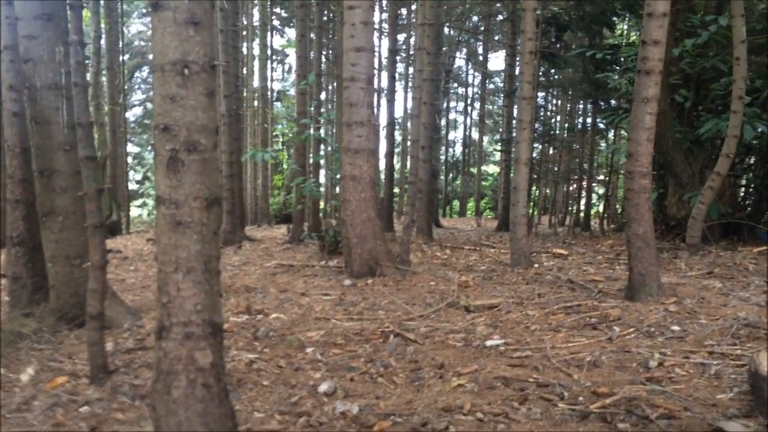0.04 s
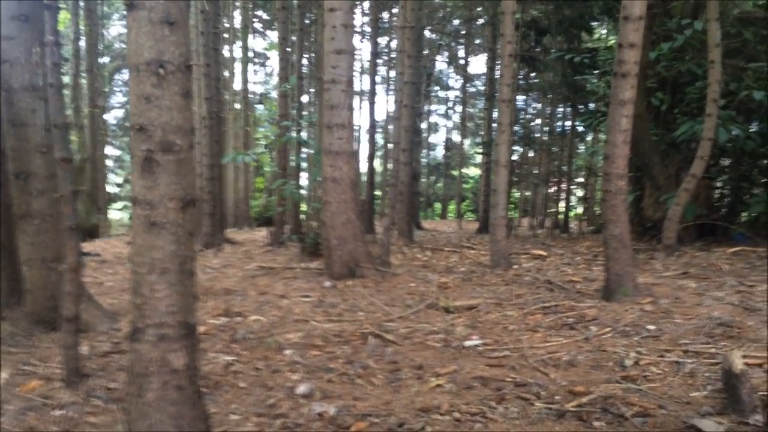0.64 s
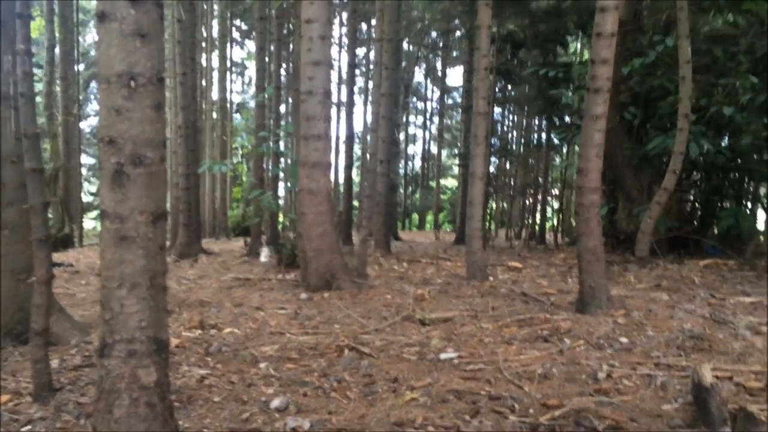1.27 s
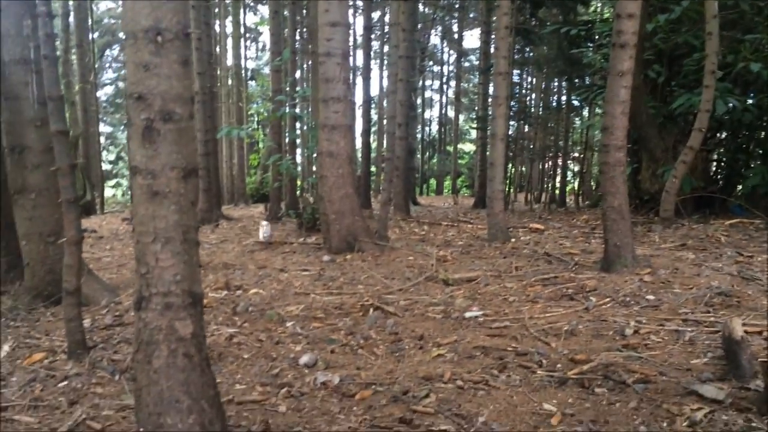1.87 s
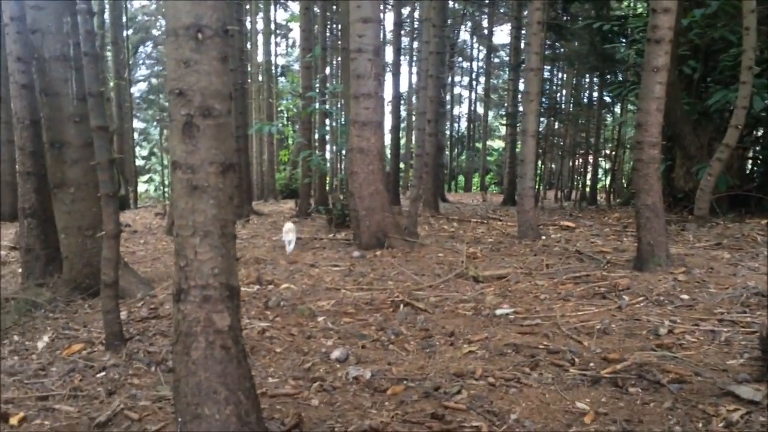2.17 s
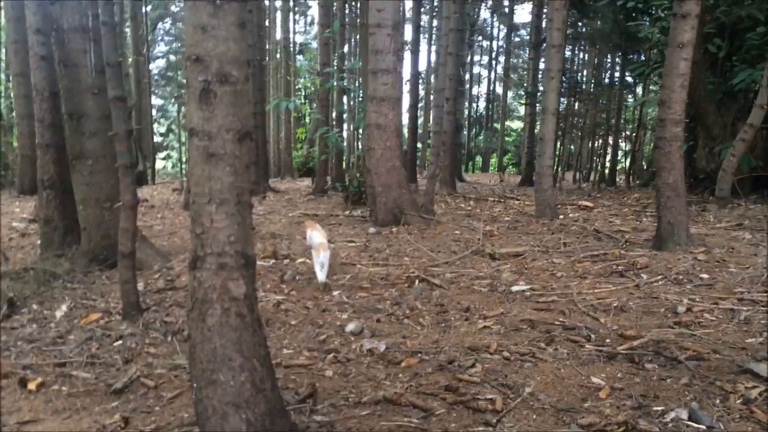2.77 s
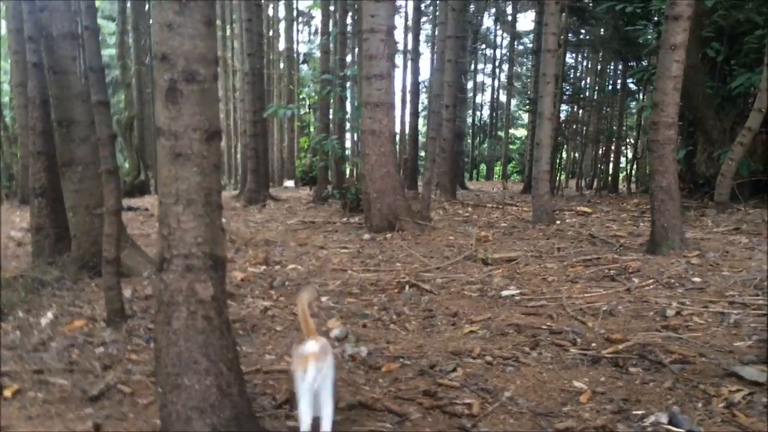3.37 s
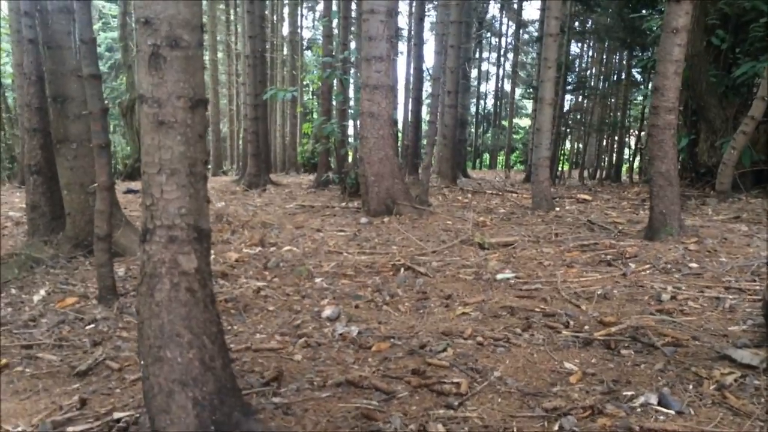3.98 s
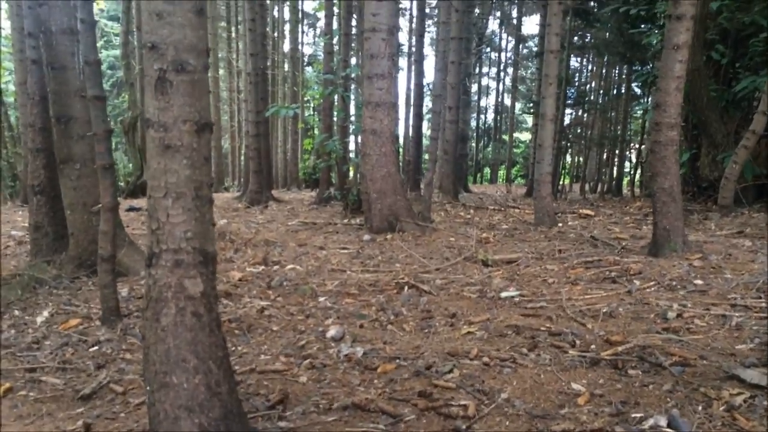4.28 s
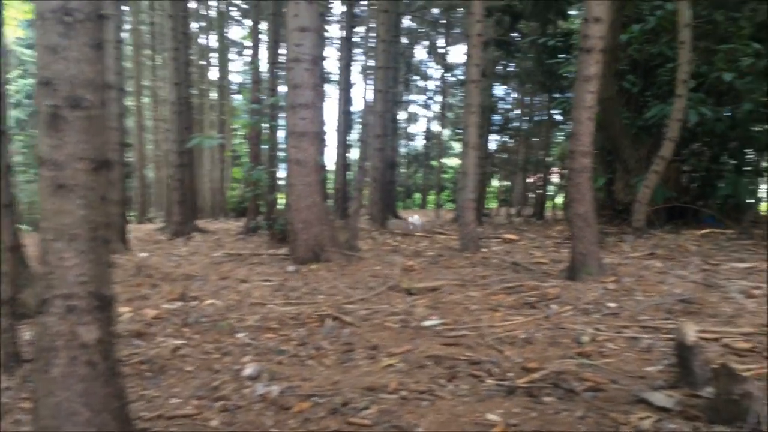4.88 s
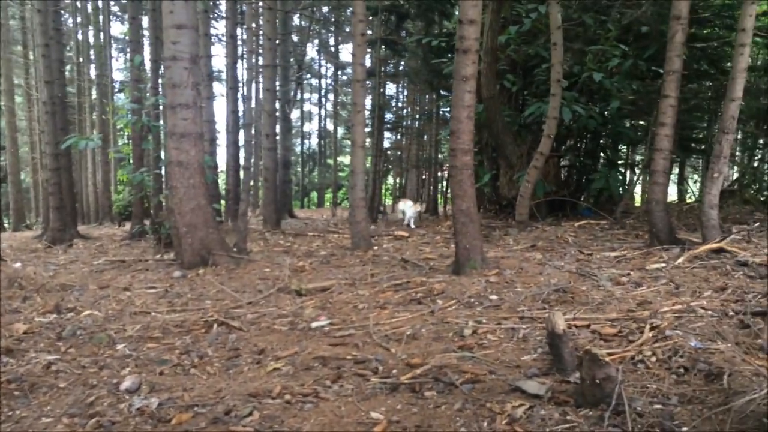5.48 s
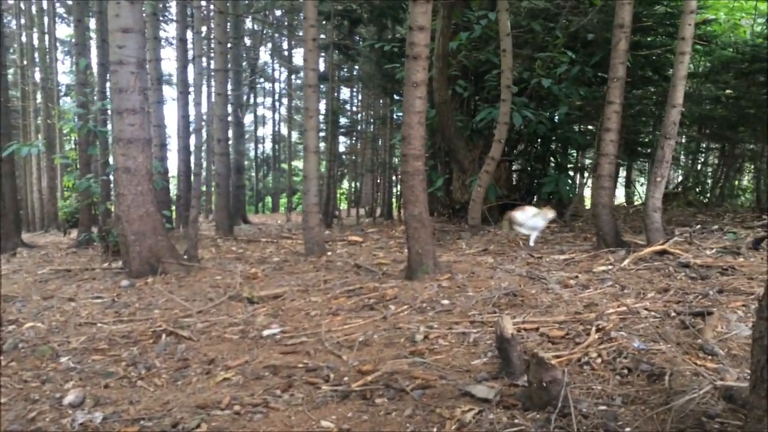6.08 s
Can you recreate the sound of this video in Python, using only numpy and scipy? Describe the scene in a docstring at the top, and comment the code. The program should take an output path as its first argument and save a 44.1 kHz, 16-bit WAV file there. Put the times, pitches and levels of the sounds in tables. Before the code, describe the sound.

In a quiet wood, someone shakes a plastic tub of dry pet food right by the microphone. Quick, regular strokes alternate a hard, bright crash of pellets with a softer slide back, over hollow plastic knocks and with barely any echo. Near the end the rattle dies away with a few last ticks, leaving a brief, soft crackle of a cat's paws on dry needles and a barely audible low hum.

```python
"""Cat food shaken in a conifer wood.

Dry pellets are shaken to and fro in a plastic tub, about three times a second, then left to settle.
They fly into the far end with a hard crash, then slide home into a softer one; the wall flexes with
a dull pop between crashes. Trunks scatter the rattle, a far engine hums, and the leaf litter
crackles faintly under a running cat."""
import sys
import numpy as np
from scipy import signal
from scipy.fft import rfft, irfft, next_fast_len
from scipy.io import wavfile
from scipy.ndimage import map_coordinates

SR = 44100
rng = np.random.default_rng(int(sys.argv[2]) if len(sys.argv) > 2 else 0)


def int16_out(signal):
    """Quantize to a 16-bit WAV file."""
    q = np.round(np.clip(np.atleast_2d(signal).T, -1, 1) * 32767)
    wavfile.write(sys.argv[1], SR, q.astype(np.int16))


N = 270639

# forward strokes into the far end: first_pellet_s, first_pellet_db, piling_s, crash_db, treble_db
THROWS = [(0.179, -18, .028, -27.5, 1), (0.530, -25.5, 0.029, -25.5, -1.5), (0.847, -15, 0.016, -24.5, 0),
          (1.160, -21.5, 0.03, -28, 1), (1.477, -26, .036, -23.5, 1), (1.767, -23.5, 0.033, -25, 3.5),
          (2.075, -17.5, 0.017, -24, 0), (2.400, -13.5, .02, -25, -0.5), (2.692, -18, 0.013, -25.5, 0.5),
          (2.9869, -25, 0.048, -27.5, 3), (3.312, -20.5, 0.03, -26, 0), (3.599, -29.5, 0.051, -27, 0.5),
          (3.912, -23, .042, -29, -4.5), (4.2345, -17, 0.04, -27.5, -0.5), (4.55, -15, 0.021, -26.5, 3.5),
          (4.8277, -14.5, 0.022, -25.5, 2.5), (5.118, -9.5, .017, -26, 1)]
# back strokes into the near end: first_pellet_s, piling_s, crash_db, slide_db
RETURNS = [(0.008, 0.042, -30, -38), (0.382, .024, -30.5, -41), (0.712, 0.025, -27, -40.5),
           (1.014, 0.033, -29, -41.5), (1.3546, 0.03, -27.5, -40.5), (1.6557, 0.018, -26.5, -38),
           (1.951, .02, -25, -35), (2.268, 0.029, -27.5, -41.5), (2.577, 0.024, -26.5, -40.5),
           (2.878, 0.023, -28, -40.5), (3.197, 0.018, -27.5, -41.5), (3.475, .032, -32, -36.5),
           (3.81, 0.035, -32, -47.5), (4.133, 0.0079, -32, -41), (4.434, 0.018, -29, -38.5),
           (4.723, 0.025, -29.5, -36), (5.0015, 0.026, -29, -37.5), (5.2878, 0.047, -39, -42)]
# spectrum of one pellet on plastic: freq_hz, gain_db
TICK_COLOUR = [(100, -17.5), (1000, 3.5), (3000, 2.5), (7000, 4), (11000, -4), (15000, -16)]


def amp(db):
    return 10 ** (np.asarray(db) / 20)


def unit(x):
    return x / np.sqrt(np.mean(x ** 2) + 1e-20)


def along(points, hz):
    """Interpolate (freq_hz, value) points on a log axis."""
    freqs_hz, values = np.transpose(points)
    return np.interp(np.log(hz + 1), np.log(freqs_hz + 1), values)


def wobble(rate_hz):
    """Smooth random curve with knots at rate_hz."""
    knots = rng.standard_normal(int(N * rate_hz / SR) + 4)
    return map_coordinates(knots, [np.arange(N) * rate_hz / SR])


def filtered(x, response):
    """Apply response(hz) to the spectrum of x."""
    size = 2 * next_fast_len(N)
    return irfft(rfft(x, size) * response(np.fft.rfftfreq(size, 1 / SR)), size)[..., :N]


def low_cut(x, corner_hz):
    return filtered(x, lambda hz: 1 - 1 / (1 + (hz / corner_hz) ** 4))


def causal(gain):
    """Minimum-phase response: rings only after the blow."""
    cepstrum = irfft(np.log(np.maximum(gain, 1e-6)))
    half = len(cepstrum) // 2
    cepstrum[1:half] *= 2
    cepstrum[half + 1:] = 0
    return np.exp(rfft(cepstrum))


def add(track, start_s, sound):
    part = track[max(round(start_s * SR), 0):][:len(sound)]
    part += sound[:len(part)]


def contacts(rate_hz, spread_db, click_s, ring_s, ring_db, spots):
    """Hail of pellet contacts, whitened, rms 1; each wall spot has its own click and short ring."""
    t = np.arange(SR // 40) / SR
    hail, power = np.zeros(N), 0
    for _ in range(spots):
        hits = rng.random(N) < rate_hz / SR / spots
        size_db = spread_db * np.minimum(rng.standard_normal(N), 1.5)
        wander_db = 3 * np.tanh(wobble(14))  # the load wanders between spots
        click = unit(rng.standard_normal(len(t)) * np.exp(-t / click_s))
        modes_hz = np.exp(rng.uniform(np.log(650), np.log(6000), size=3))
        ring = sum(np.sin(2 * np.pi * hz * t) for hz in modes_hz)
        contact = click + amp(ring_db) * unit(ring * np.exp(-t / ring_s))
        hail += signal.oaconvolve(hits * amp(size_db + wander_db), contact)[:N]
        power = power + np.abs(rfft(contact)) ** 2
    bins_hz = np.fft.rfftfreq(len(t), 1 / SR)
    return unit(filtered(hail, lambda hz: 1 / np.sqrt(np.interp(hz, bins_hz, power))))


def ticks(rows, click_s, patter_s):
    """Sharp ticks, each with a brief patter; rows: start_s, level_db, relative_patter_db."""
    track, t = np.zeros(N), np.arange(SR // 10) / SR
    for start_s, level_db, patter_db in rows:
        click = np.tanh(rng.standard_normal(len(t))) * np.exp(-t / click_s)
        grit = rng.standard_normal(len(t))
        patter = unit(grit * np.sqrt(np.abs(grit))) * np.exp(-t / patter_s)
        add(track, start_s, amp(level_db) * (click + amp(patter_db) * patter))
    return track


def impacts():
    """Crashes of both strokes: peak_s, level_db, rise_s, fall_s, hollow_db, bright_db."""
    rows = []
    for start_s, _, piling_s, level_db, treble_db in THROWS:
        length_s = 0.046 * amp(-0.3 * (level_db + 24.5))  # harder is shorter
        rise_s = 0.78 * piling_s
        fall_s = max(length_s - rise_s, 0.01)
        rows.append((start_s + piling_s, level_db, rise_s, fall_s, 0.5, treble_db + 1.06))
    for start_s, piling_s, level_db, _ in RETURNS:
        rows.append((start_s + piling_s, level_db, piling_s, 0.026, -1.3, -0.24))  # thinner, duller
    rows = np.array(rows)
    rows[:, 5] += 0.23 * (rows[:, 1] - rows[:, 1].mean())  # harder is brighter
    return rows


def crashes():
    """The load piles into one end: bright contacts lead, a hollow thud follows, a few rebound."""
    t = np.arange(N) / SR
    band_delay_s = np.array([[0.003], [0], [-0.002]])  # low, mid, high
    power = np.zeros((3, N))
    for peak_s, level_db, rise_s, fall_s, hollow_db, bright_db in impacts():
        near = np.abs(t - peak_s) < 0.2
        lag_s = t[near] - peak_s - band_delay_s
        swell = np.exp(-np.where(lag_s < 0, np.abs(lag_s / rise_s) ** 2.42, np.abs(lag_s / fall_s) ** 1.7))
        band_gain = amp([[level_db + hollow_db], [level_db], [level_db + bright_db]])
        power[:, near] += (band_gain * swell) ** 2
    hail = contacts(rate_hz=4200, spread_db=2, click_s=0.00023, ring_s=0.005, ring_db=-7, spots=16)
    low = filtered(hail, lambda hz: 1 / (1 + (hz / 1000) ** 4))
    high = low_cut(hail, corner_hz=4500)
    blows = np.sum(np.sqrt(power) * [low, hail - low - high, high], axis=0)
    rebounds = contacts(rate_hz=56, spread_db=5, click_s=0.0003, ring_s=0.002, ring_db=-7, spots=6)
    rebounds *= np.interp(t - 0.035, t, np.sqrt(power[1]), left=0)
    clicks = amp(-30) * tub(rebounds, TICK_COLOUR, ring_db=1)
    # crash spectrum: freq_hz, gain_db
    crash_colour = [(40, -28), (100, -7.5), (190, 0), (340, -5), (490, -2), (730, 1.5), (1300, -0.5),
                    (2000, -1), (3500, -1), (7000, -7.5), (11000, -14), (15000, -22.5)]
    return amp(-0.36) * tub(blows, crash_colour, ring_db=7) + clicks


def slide_level_db():
    """Tumble until the hand rests; two hushes and a trickle per throw, a swell per return."""
    rest_s, settle_db_per_s = 5.372, 102
    rise_db_per_s, fall_db_per_s, trickle_db_per_s = 176, 170, 169.5
    t = np.arange(N) / SR
    tumble_db = -45 - settle_db_per_s * np.maximum(t - rest_s, 0)
    power = np.zeros(N)
    for start_s, _, piling_s, crash_db, _ in THROWS:
        near = np.abs(t - start_s) < 0.3
        lag_s = t[near] - start_s
        tumble_db[near] -= 2.5 * np.exp(-((lag_s + 0.06) / 0.05) ** 2)  # load in flight
        tumble_db[near] -= 11 * np.exp(-((lag_s - 0.12) / 0.016) ** 2)  # load packed in the far end
        trickle_db = crash_db - 9 - trickle_db_per_s * np.abs(lag_s - piling_s)
        power[near] += (lag_s > piling_s) * amp(trickle_db) ** 2
    for start_s, piling_s, _, slide_db in RETURNS:
        near = np.abs(t - start_s) < 0.4
        lag_s = t[near] - (start_s + piling_s - 0.045)  # peaks just before the crash
        power[near] += amp(slide_db + np.minimum(rise_db_per_s * lag_s, -fall_db_per_s * lag_s)) ** 2
    return 10 * np.log10(power + amp(tumble_db) ** 2)


def slide():
    """Pellets tumble along the wall; the slower they move, the more hollow ring outweighs click."""
    # slide spectrum: freq_hz, gain_db
    slide_colour = [(40, -16.5), (110, -4), (200, 4), (360, 5), (540, -3.5), (800, 2.5), (2000, 0),
                    (4000, -2.5), (7000, -9.5), (11000, -21.5), (15000, -28.5)]
    level_db = slide_level_db()
    hail = contacts(rate_hz=2400, spread_db=2.5, click_s=0.00029, ring_s=0.0038, ring_db=-10, spots=12)
    soft = filtered(hail, lambda hz: (1 + 0.66 / (1 + (hz / 420) ** 6)) / (1 + (hz / 5500) ** 2))
    vigour = np.clip(amp(0.5 * (level_db + 40.5)), 0, 1)
    envelope = amp(level_db + 1.46 + 1.77 * wobble(55))
    return tub(envelope * (soft + vigour * (hail - soft)), slide_colour, ring_db=5)


def knocks(clumps=3):
    """Clumps of pellets land together and knock the end of the tub, most in hard crashes."""
    # modes of the loaded end: pitch_hz, level_db, t60_s
    end_modes = [(331, 1, 0.14), (626, -2, 0.036), (758, -1, 0.028), (930, -5.5, 0.022), (1100, -6, 0.04),
                 (1260, -8.5, .03), (1958, 4, 0.062)]
    track, t = np.zeros(N), np.arange(SR // 10) / SR
    for peak_s, crash_db, rise_s, fall_s, hollow_db, _ in impacts():
        force_db = crash_db + hollow_db + 1.86 * (crash_db + 23) - 6
        for lag_s in np.clip(rng.normal(0.0046, 0.007, size=clumps), -rise_s, fall_s):
            ring = 0
            for hz, mode_db, t60_s in end_modes:
                envelope = rng.normal() * amp(mode_db - 60 * t / t60_s)
                ring += envelope * np.sin(2 * np.pi * hz * rng.normal(1, 0.025) * t)
            add(track, peak_s + lag_s, amp(force_db) * ring)
    return low_cut(track, corner_hz=120)


def strays(stragglers=2):
    """Single pellets strike bare plastic: some lead each crash, some fly alone, a few drop late."""
    # pellets clear of the load: start_s, level_db
    lone_pellets = [(0.2966, -26), (1.2804, -23), (1.4943, -16), (1.5654, -24.5), (1.8867, -27),
                    (2.0893, -16.5), (2.1873, -25.5), (2.4909, -23.5), (2.7655, -23.5), (2.7819, -22),
                    (2.7877, -20.5), (2.9942, -21), (3.0904, -22), (3.6168, -13), (3.6944, -14),
                    (4.5415, -19), (5.1013, -19), (5.3737, -25.5), (5.449, -37), (5.563, -48), (5.633, -53)]
    lead_patter_db, lone_patter_db = -12.5, -23.5
    leaders = [(s, db, lead_patter_db) for s, db, *_ in THROWS]
    grazes = [(s - 0.009, db - 18, lead_patter_db) for s, db, *_ in THROWS]
    returning = [(s, db + 2.5, lead_patter_db) for s, _, db, _ in RETURNS]
    lone = [(s, db, lone_patter_db) for s, db in lone_pellets]
    late = [(s + rng.uniform(0.05, 0.091), rng.normal(-27.5, 4.6), lone_patter_db)
            for s, *_ in THROWS for _ in range(stragglers)]
    strikes = ticks(leaders + grazes + returning + lone + late, click_s=0.00021, patter_s=0.013)
    return amp(1) * tub(strikes, TICK_COLOUR, ring_db=4)


def tub(x, colour, ring_db):
    """The tub lays its resonances over a broad colour, at an rms gain of 1."""
    # tub and enclosed air: centre_hz, width_hz, level_db
    resonances = [(220.4, 47, -2), (306, 33, 3.5), (347.4, 22, 4.5), (775, 130, -6.5), (1135, 310, -9.5),
                  (1475, 74, -6), (2150, 440, -6.5), (2710, 66, -10), (3500, 110, -10)]

    def response(hz):
        ring = sum(amp(level_db) ** 2 / (1 + (2 * (hz - centre_hz) / width_hz) ** 2)
                   for centre_hz, width_hz, level_db in resonances)
        return causal(unit(amp(along(colour, hz)) * np.sqrt(1 + amp(ring_db) ** 2 * ring)))
    return filtered(x, response)


def free_end(x, freedom=1, pitch_hz=1818, width_hz=50):
    """The tub's end adds one narrow ring, damped by the grip, freer under loose pellets."""
    # ring as the grip shifts: time_s, gain
    grip_curve = [(0, 2.3), (1.6, 1.6), (3.0, 1.3), (4.2, 0.33), (5.4, .1)]
    ring = filtered(x, lambda hz: 1j * hz * width_hz / (pitch_hz ** 2 - hz ** 2 + 1j * hz * width_hz))
    return x + freedom * np.interp(np.arange(N) / SR, *np.transpose(grip_curve)) * ring


def flexes():
    """The wall gives as the hand reverses, and once more when the tub is bumped after the shaking: its lowest
    modes ring, scuffed by the shifting grip."""
    # wall modes: pitch_hz, level_db, t60_s
    wall_modes = [(150, -14, 0.11), (204, 4.5, 0.092), (293, 5.5, 0.06), (355, -14.5, 0.033)]
    # wall pops, the last from a bump after the shaking: start_s, level_db, tilt_db_per_octave
    pops = [(0.118, -27.5, -4), (0.477, -32, -14.5), (0.7922, -26.5, -7), (1.439, -28, 8.5),
            (1.7284, -28, 14), (1.9294, -30, 14), (2.0238, -29.5, 4.5), (2.343, -29.5, 13),
            (2.635, -38, -8), (2.938, -33, 10), (3.2675, -29.5, -5), (3.8727, -34, -12),
            (4.1888, -30.5, -3.5), (4.4947, -27.5, -2.5), (4.78, -26, -1.5), (4.9337, -34, -9),
            (5.063, -28, 9), (6.012, -62.5, 8)]
    track, t = np.zeros(N), np.arange(SR // 5) / SR
    scuff_band = signal.butter(2, [130, 380], "band", fs=SR, output="sos")
    attack = 1 - np.exp(-t / 0.002)
    for start_s, level_db, tilt_db_per_octave in pops:
        ring = 0
        for hz, mode_db, t60_s in wall_modes:
            onset_db = mode_db + tilt_db_per_octave * np.log2(hz / 245) + rng.normal(0, 2.3)
            ring += amp(onset_db - 60 * t / t60_s) * np.sin(2 * np.pi * hz * rng.normal(1, 0.036) * t)
        scuff = unit(signal.sosfilt(scuff_band, rng.standard_normal(len(t)))) * np.exp(-t / 0.012)
        add(track, start_s, amp(level_db - 3) * (0.61 * scuff - ring) * attack)
    return low_cut(track, corner_hz=105)  # a small wall radiates little bass


def bumps():
    """Handling gives low, heavily damped pushes."""
    # handling bumps: start_s, level_db
    pushes = [(3.389, -45), (3.633, -41), (3.765, -42), (3.861, -43), (6.029, -58)]
    track, t = np.zeros(N), np.arange(SR // 5) / SR
    push = np.sin(2 * np.pi * 82 * t) + 0.92 * np.sin(2 * np.pi * 140 * t)
    envelope = (1 - np.exp(-t / 0.0087)) * np.exp(-t / 0.016)
    for start_s, level_db in pushes:
        add(track, start_s, amp(level_db + 7.5) * push * envelope)
    return track


def forest(x):
    """Trunks scatter a thin tail whose bass lasts longest."""
    # decay of the wood: freq_hz, t60_s
    decay_times = [(150, 0.99), (400, 0.73), (1500, 0.35), (5000, 0.42), (14000, 0.48)]
    hz, t, spectrum = signal.stft(rng.standard_normal(SR), SR, nperseg=256)
    decay = amp(-60 * t / along(decay_times, hz)[:, None])
    build_up = 1 - np.exp(-t / 0.043)
    tail = signal.istft(spectrum * decay * build_up, SR, nperseg=256)[1]
    return signal.fftconvolve(x, tail / np.linalg.norm(tail))[:N]


def paws():
    """Dry needles and twigs crackle under the cat."""
    # paw falls: start_s, level_db, relative_patter_db
    steps = [(5.8134, -57.5, -13), (5.9783, -53, -15.5), (5.9913, -43.5, -18), (6.0347, -59, -8.5),
             (6.0879, -55.5, -13.5)]
    crackle = ticks(steps, click_s=0.001, patter_s=0.028)
    return amp(-0.5) * filtered(crackle, lambda hz: hz / np.hypot(hz, 1500))


def engine():
    """A far engine hums, wavering in pitch and level."""
    # hum partials: pitch_hz, level_db
    partials = [(75.2, -67.5), (112.5, -74), (150, -73)]
    # hum swell: time_s, gain_db
    swell = [(0, 12.5), (1.2, 11), (2.2, 2.5), (3.5, 13.5), (4.6, 5.5), (5.7, 1)]
    warped_s = np.cumsum(1 + 0.0048 * wobble(1.8)) / SR
    hum = 0
    for hz, level_db in partials:
        envelope = np.sqrt(2) * amp(level_db + 3 * wobble(4.7))
        hum += envelope * np.sin(2 * np.pi * (hz * warped_s + rng.random()))
    return hum * amp(np.interp(np.arange(N) / SR, *np.transpose(swell)))


def air():
    """Low rumble of still forest air."""
    # air spectrum: freq_hz, gain_db
    air_colour = [(20, -17), (52, -3.5), (115, -8.5), (200, -21.5), (450, -20), (800, -26), (1200, -25),
                  (2500, -35), (15000, -39.5)]
    return amp(-69) * unit(filtered(rng.standard_normal(N), lambda hz: amp(along(air_colour, hz))))


def faint_tone():
    """A slightly falling tone comes and goes near the end."""
    t = np.arange(N) / SR
    pitch_hz = np.interp(t, [5.65, 5.82], [1065, 1020]) + 16 * wobble(90)
    envelope = amp(-70.5) * np.exp(-np.abs(t - 5.76) / 0.095)
    return envelope * np.sin(2 * np.pi * np.cumsum(pitch_hz) / SR)


def scene():
    """The close tub, its faint echo, the cat and the background, in mono."""
    shaker = free_end(crashes()) + free_end(slide(), freedom=1.35) + knocks() + strays() + flexes()
    echo = amp(-30) * forest(shaker)
    return (shaker + echo + bumps() + paws() + engine() + air() + faint_tone())[None]


def record(dry):
    """Brick-wall low-pass."""
    top_hz = 15400
    return filtered(dry, lambda hz: hz < top_hz)


dry = scene()
out = record(dry)
int16_out(out)
```